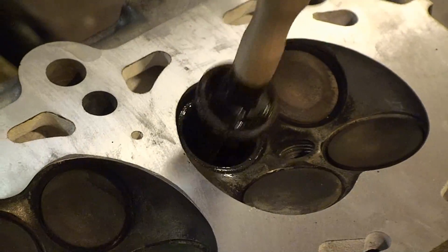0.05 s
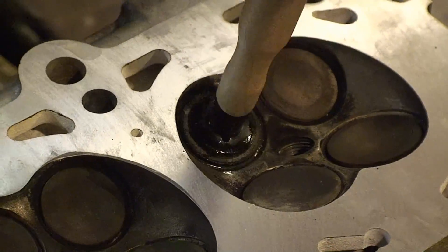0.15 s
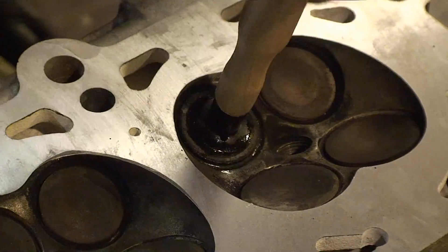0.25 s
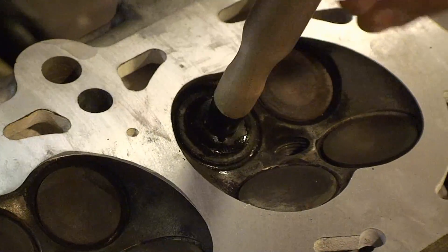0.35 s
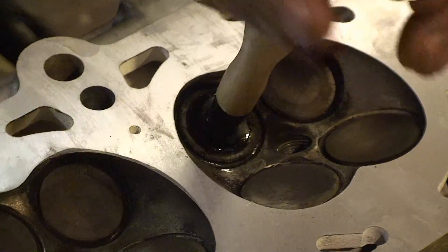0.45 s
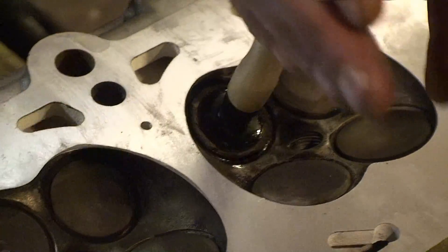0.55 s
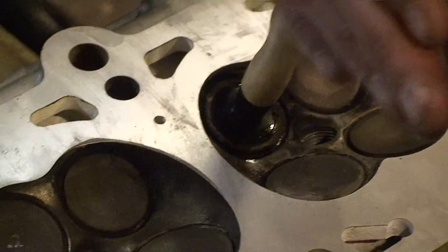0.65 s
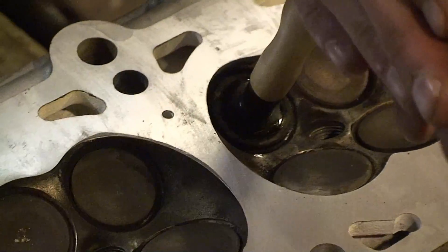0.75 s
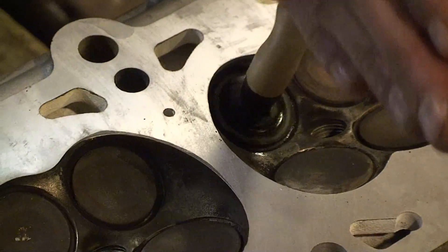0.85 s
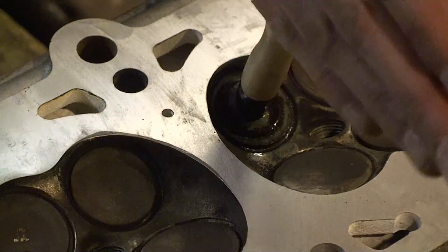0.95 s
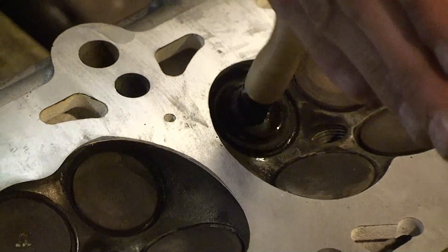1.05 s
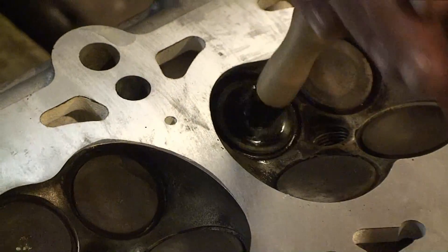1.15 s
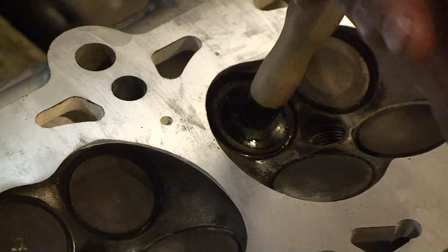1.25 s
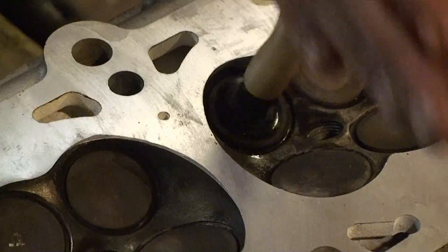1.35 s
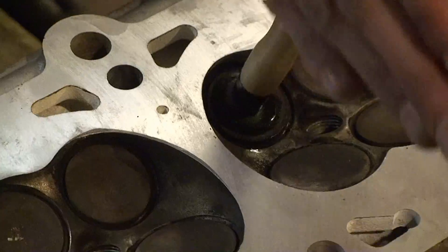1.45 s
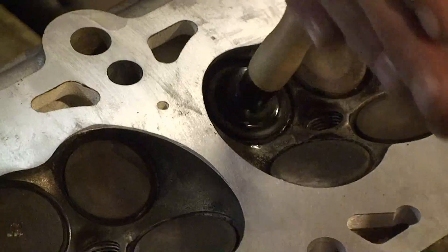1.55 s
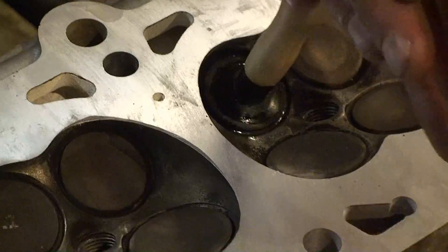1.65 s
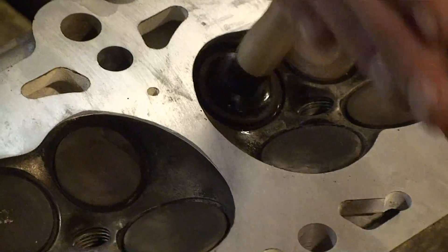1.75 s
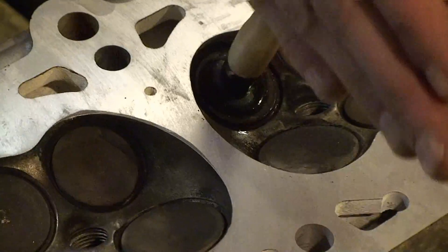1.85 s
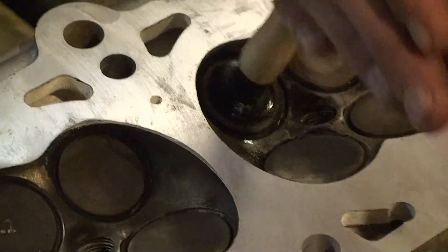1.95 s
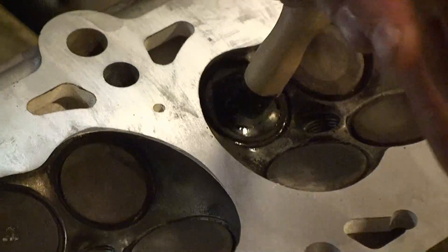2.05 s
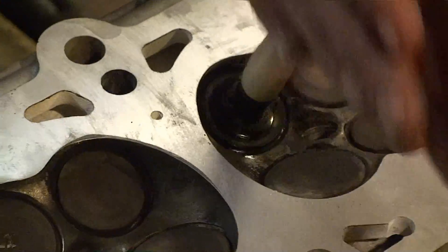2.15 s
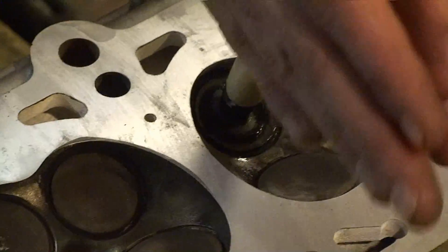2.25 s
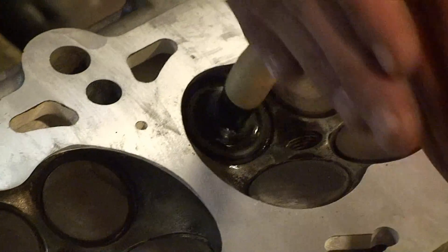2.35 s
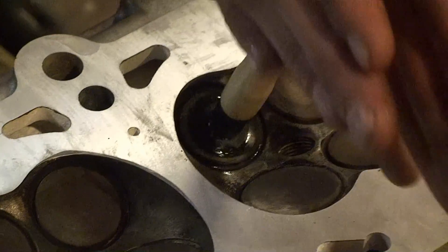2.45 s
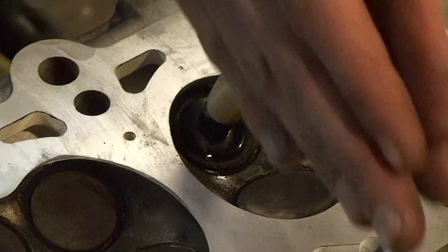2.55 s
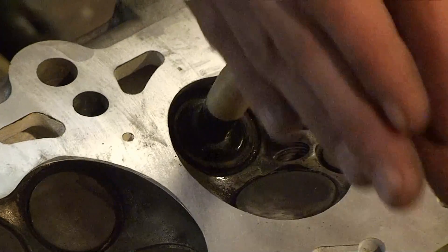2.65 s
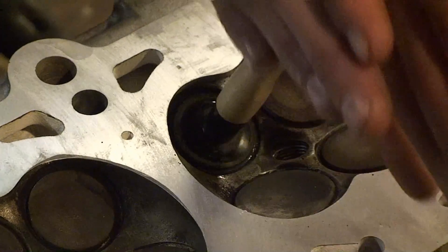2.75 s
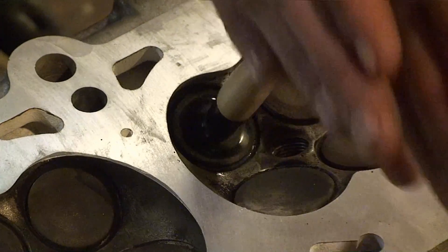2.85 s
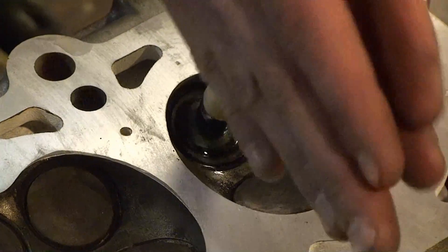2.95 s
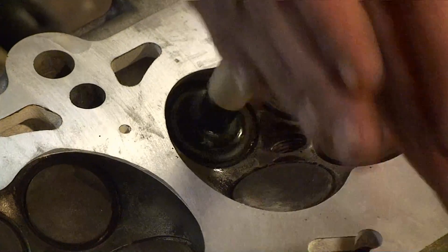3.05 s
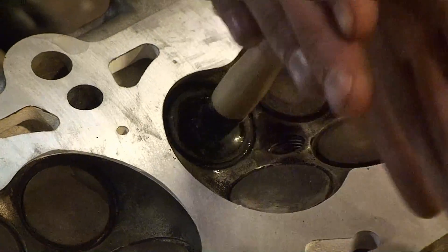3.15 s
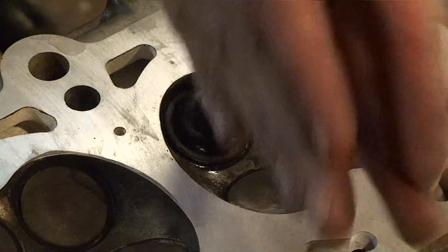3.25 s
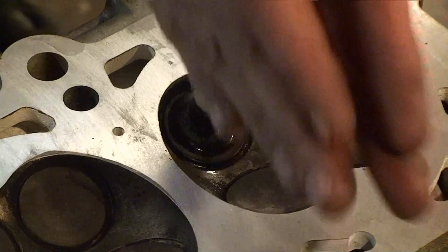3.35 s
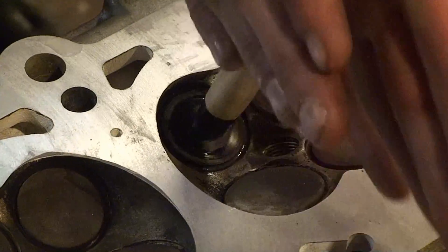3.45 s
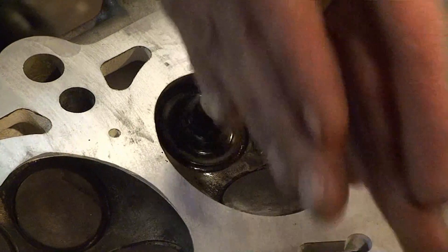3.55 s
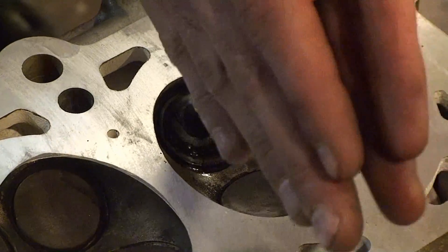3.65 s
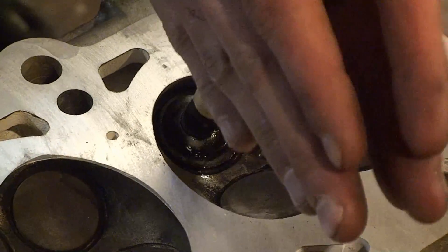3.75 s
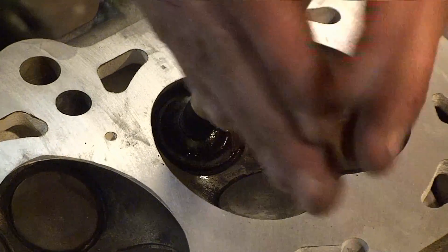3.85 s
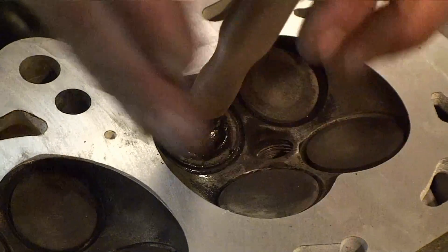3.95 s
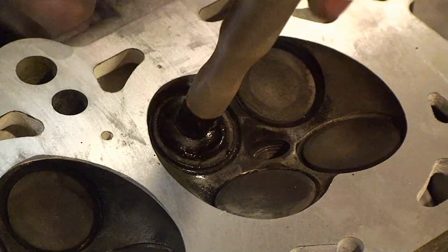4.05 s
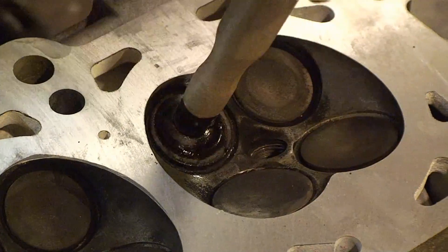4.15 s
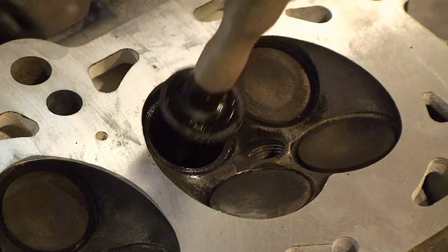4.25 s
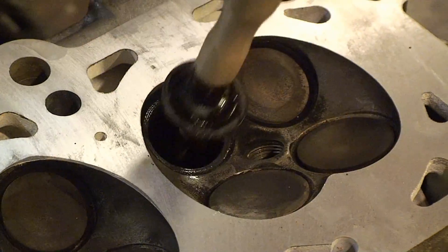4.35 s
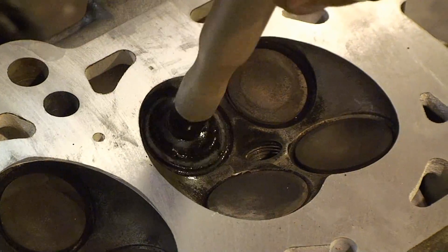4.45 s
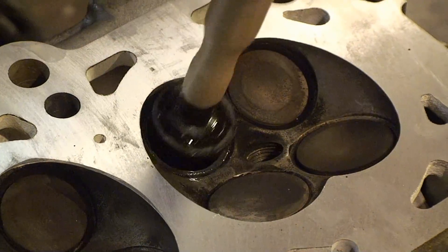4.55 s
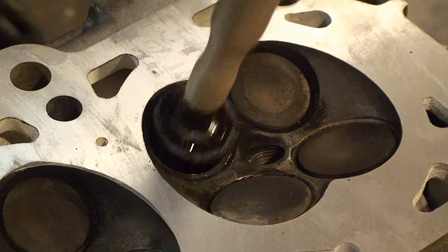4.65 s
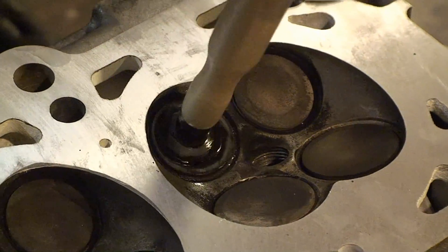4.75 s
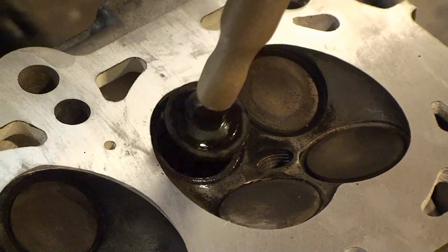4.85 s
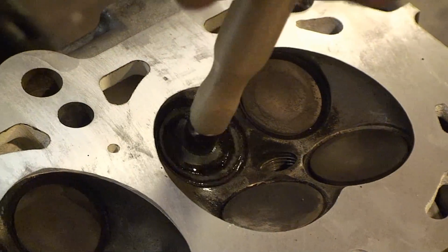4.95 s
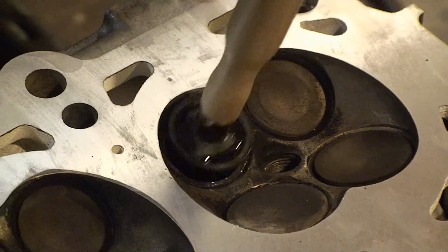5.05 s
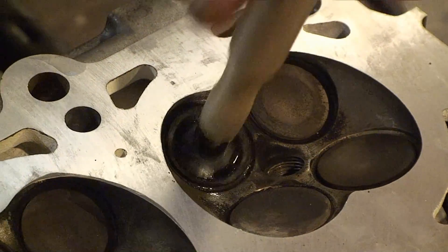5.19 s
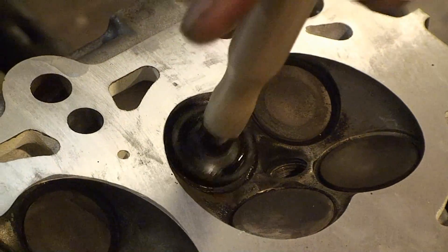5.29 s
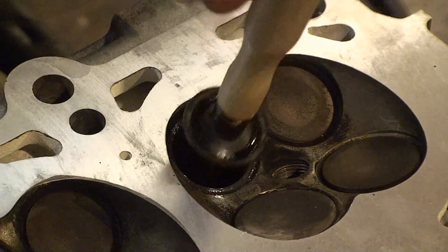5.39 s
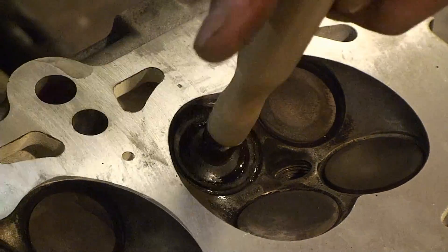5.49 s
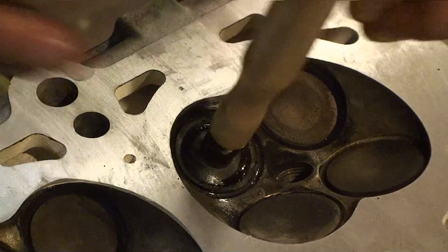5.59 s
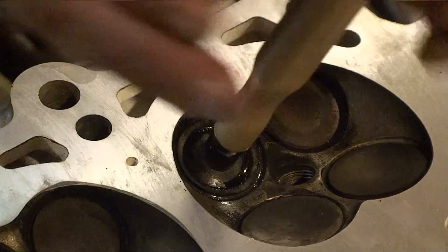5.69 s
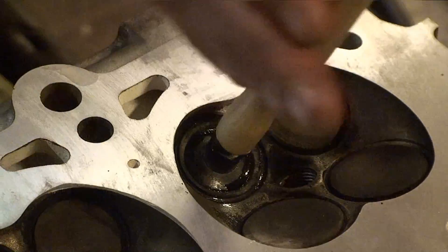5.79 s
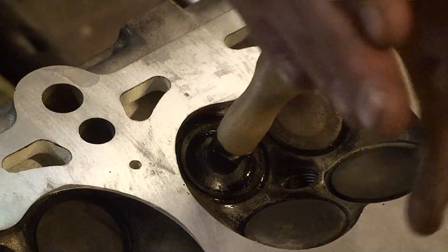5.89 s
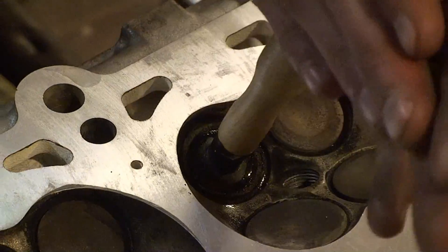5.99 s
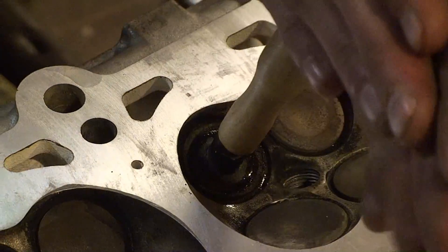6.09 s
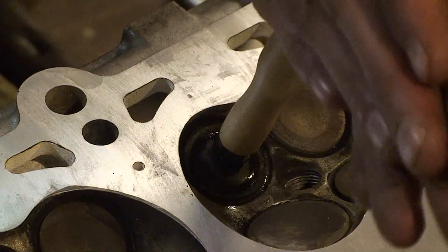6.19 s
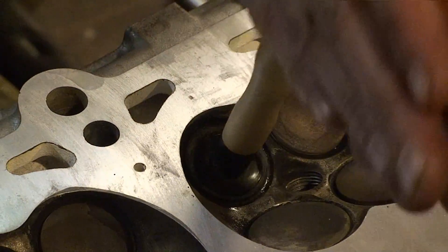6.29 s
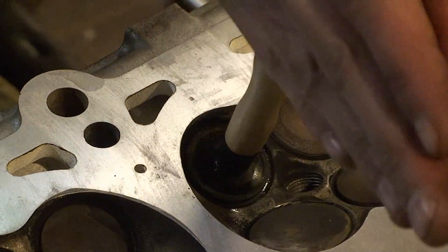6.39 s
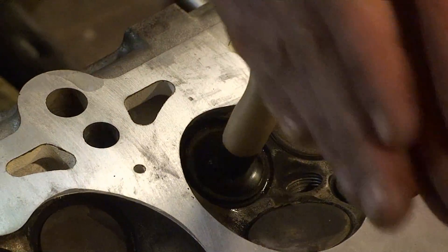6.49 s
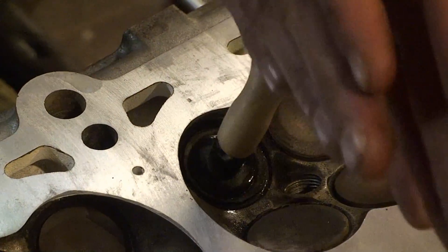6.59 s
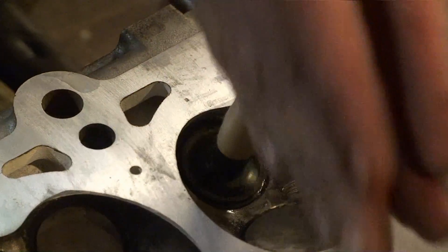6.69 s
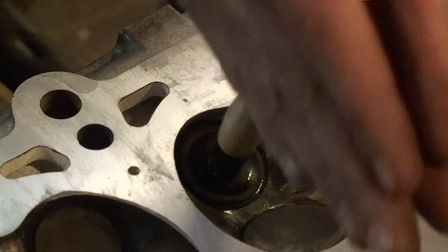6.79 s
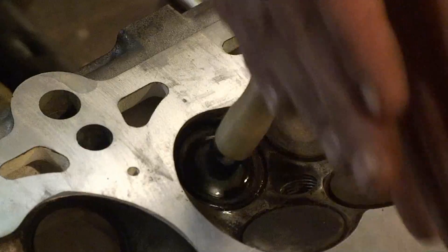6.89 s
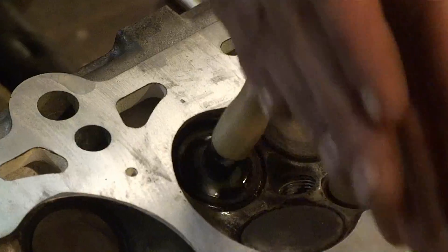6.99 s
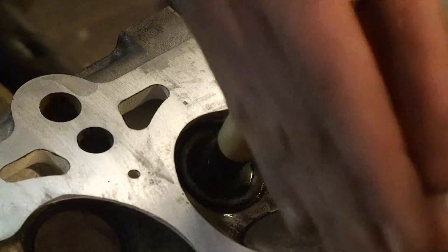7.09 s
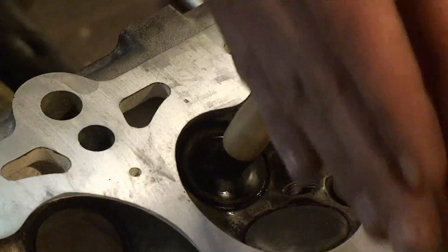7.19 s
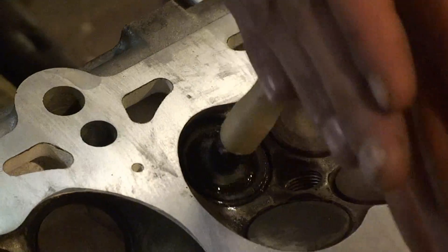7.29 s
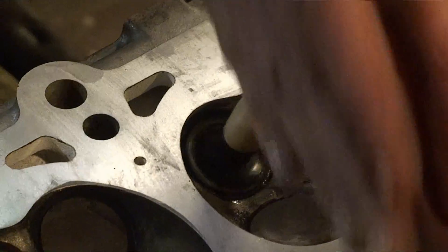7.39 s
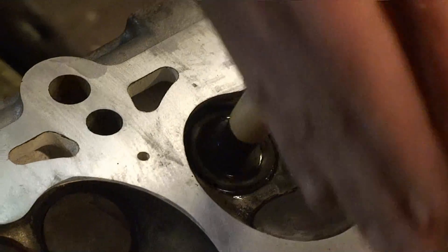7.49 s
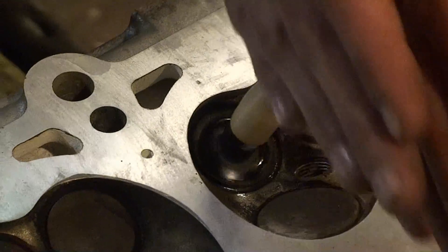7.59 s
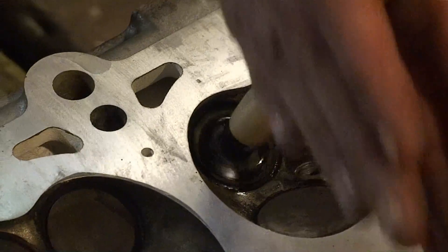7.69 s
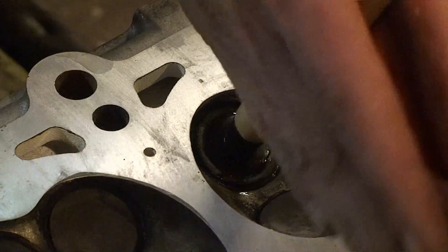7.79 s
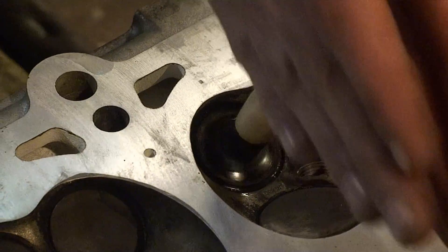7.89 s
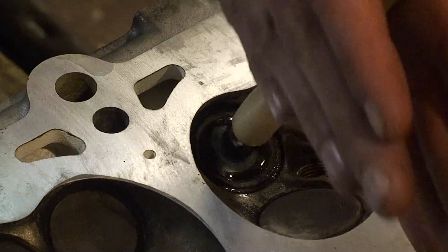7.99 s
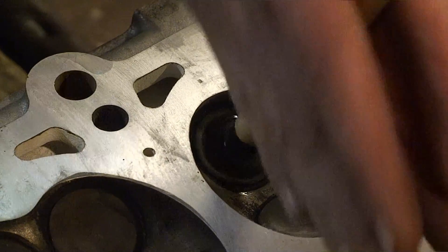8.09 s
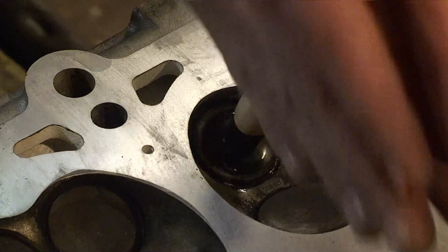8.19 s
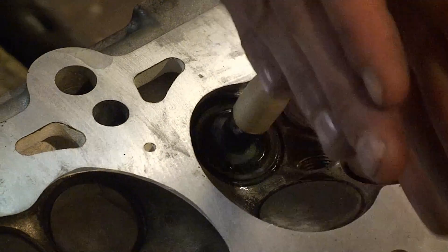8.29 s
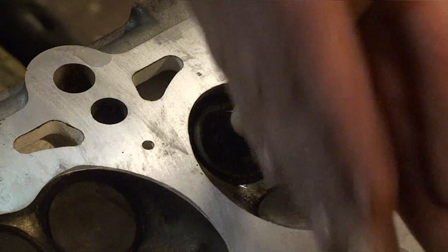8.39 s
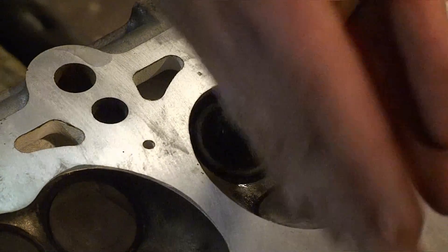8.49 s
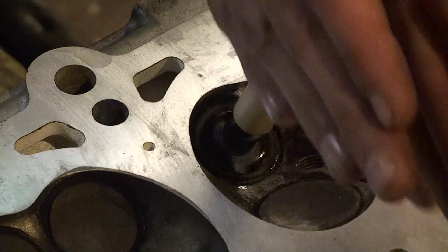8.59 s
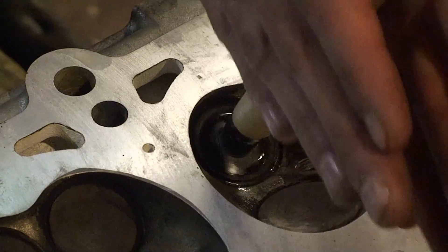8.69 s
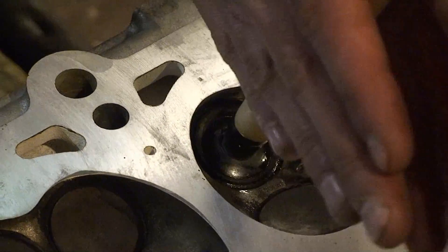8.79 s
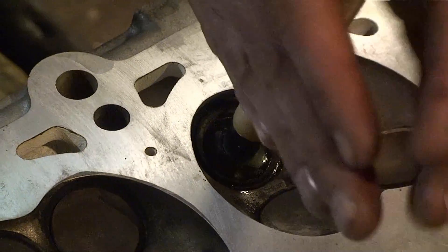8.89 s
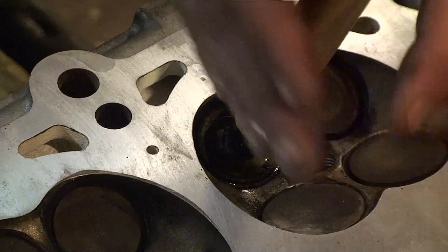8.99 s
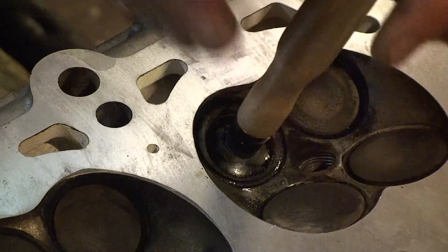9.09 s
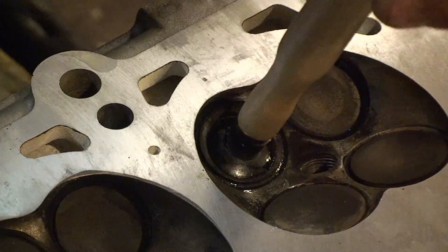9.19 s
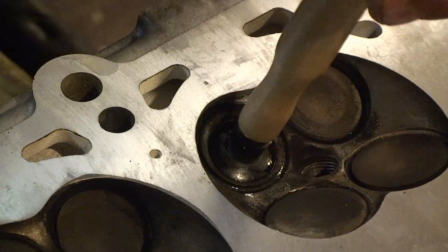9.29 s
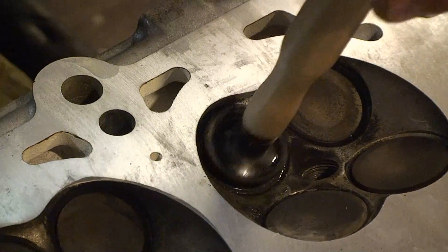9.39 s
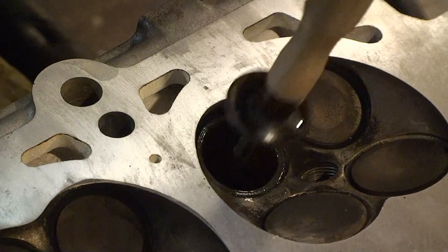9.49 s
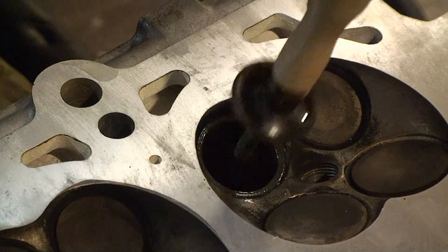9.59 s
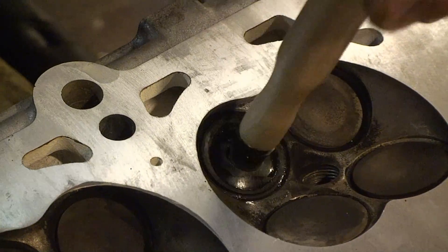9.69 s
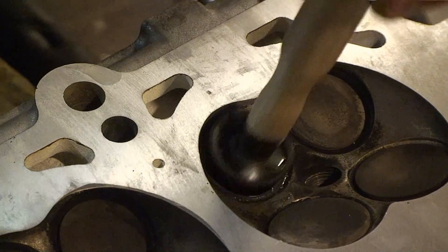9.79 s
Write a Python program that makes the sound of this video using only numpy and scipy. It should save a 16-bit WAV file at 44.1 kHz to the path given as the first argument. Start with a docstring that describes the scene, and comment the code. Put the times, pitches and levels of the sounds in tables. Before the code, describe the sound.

A valve clacks once onto its seat in a metal cylinder head. Rapid alternating scrapes begin, about five or six a second, coarse with cracking grains, wearing down to finer, softer hiss. Four strong taps and a weak one break the work; the scraping returns coarse and wears fine again. Hand ticks and a single tap end it. Close microphone, slightly left, short garage reflections, low hum.

```python
"""A low hum and faint air open the scene; then a valve knocks, ringing, on its seat in a small garage.
Two spells of lapping follow: a stick rolled between the palms twists the valve to and fro on gritty paste.
Random grain impacts excite modes of valve and head; coarse crunch wears down to a fine hiss in each spell.
Between spells paired contact impulses tap the valve on its seat; filtered noise makes the air and hum,
and decaying noise makes the answer of the walls."""
import sys
import numpy as np
from scipy import signal
from scipy.fft import rfft, irfft, next_fast_len
from scipy.io import wavfile
from scipy.ndimage import uniform_filter1d, map_coordinates

SR = 44100
rng = np.random.default_rng(int(sys.argv[2]) if len(sys.argv) > 2 else 0)


def digitize_waveform(pressure):
    """Quantize a signal to 16-bit integers and store it at the path in sys.argv[1].

    Rows of a 2-D input are taken as channels; values are limited to [-1, 1].
    """
    field = np.atleast_2d(pressure).T
    bounded = np.clip(field, -1, 1)
    quanta = np.round(bounded * 32767).astype(np.int16)
    wavfile.write(sys.argv[1], SR, quanta)


N = 433944  # length of the scene [samples]


def amp(db):
    """Logarithmic level: decibels to amplitude gain."""
    return 10 ** (np.asarray(db) / 20)


def unit(x):
    """Normalisation: x scaled to rms 1."""
    return x / np.sqrt(np.mean(np.abs(x) ** 2) + 1e-20)


def along(points, hz):
    """Logarithmic frequency scale: (frequency [Hz], value) points interpolated at hz."""
    frequency, value = np.transpose(points)
    return np.interp(np.log(hz + 1), np.log(frequency + 1), value)


def curve(rows):
    """Linear interpolation: (time [s], value) rows as one value per sample."""
    return np.interp(np.arange(N) / SR, *np.transpose(rows))


def wobble(rate):
    """Slow random modulation: a smooth curve through rate random knots a second."""
    knots = rng.standard_normal(int(N * rate / SR) + 4)
    return map_coordinates(knots, [np.arange(N) * rate / SR])


def swells(rows, fall_s):
    """Exponential swell: a gain rises to each (time [s], level [dB]) row and falls by 1/e in fall_s."""
    t = np.arange(N) / SR
    return sum(amp(db) * np.exp(-np.abs(t - s) / fall_s) for s, db in rows)


def add(track, s, sound):
    """Superposition: a sound mixed into a track at time s."""
    part = track[round(s * SR):][:len(sound)]
    part += sound[:len(part)]


def filtered(x, response):
    """Linear filtering: the spectrum of x times a complex response of frequency."""
    n = x.shape[-1]
    padded = 2 * next_fast_len((n + SR // 2) // 2)  # room for the ringing to die away
    hz = np.fft.rfftfreq(padded, 1 / SR)
    return irfft(rfft(x, padded) * response(hz), padded)[..., :n]


def causal(points, hz):
    """Minimum phase: the folded cepstrum of (frequency [Hz], gain [dB]) points gives a causal response."""
    cepstrum = irfft(np.log(amp(along(points, hz))))
    half = len(cepstrum) // 2
    fold = np.r_[1, np.full(half - 1, 2), 1, np.zeros(half - 1)]
    return np.exp(rfft(cepstrum * fold))


def resonance(hz, centre, width):
    """Damped oscillator: the response of one mode, gain 1 at its centre."""
    return 1j * hz * width / (centre ** 2 - hz ** 2 + 1j * hz * width)


def noise(spectrum):
    """Spectral shaping: Gaussian noise coloured by (frequency [Hz], level [dB]) points, rms 1."""
    return unit(filtered(rng.standard_normal(N), lambda hz: amp(along(spectrum, hz))))


def grains(rate, spread_db):
    """Shot noise: random impulses of uneven size and either sign, rate a second, rms 1."""
    sizes = amp(spread_db * rng.standard_normal(N)) * rng.choice([-1, 1], N)
    struck = rng.random(N) < rate / SR
    return unit(struck * sizes / np.sqrt(rate))


def burst(t60):
    """Exponential decay: a short dying rattle of micro-contacts, energy 1."""
    t = np.arange(SR // 10) / SR
    x = amp(-60 * t / t60) * rng.standard_normal(len(t))
    return x / np.linalg.norm(x)


# spectrum of the room air: (frequency [Hz], relative density [dB per Hz])
AIR_SPECTRUM = [(15, -46), (25, -10.5), (59, -22), (86, -5.5), (107, -9), (173, -7.5), (368, -9),
                (445, -13.5), (722, -8), (895, -9), (970, -14), (2300, -19.5), (2920, -23.5), (4380, -26.5),
                (15500, -34.5)]
# level of the hum: (time [s], level [dB])
HUM_LEVEL = [(0.0, -73.5), (4.15, -75), (4.55, -67.5), (4.85, -70), (5.1, -63.5), (5.8, -71), (6.1, -75),
             (7.9, -68.5), (8.74, -64.5), (9.84, -69.5)]
AIR_DB = -65


def background():
    """Filtered noise: broadband room air and a narrow-band, wavering low hum."""
    air = amp(AIR_DB + 0.2 * wobble(1.36)) * noise(AIR_SPECTRUM)
    hum = unit(filtered(rng.standard_normal(N), lambda hz: resonance(hz, 106.2, 26.6) ** 2))
    return air + amp(curve(HUM_LEVEL)) * hum


# reverberation time of the garage: (frequency [Hz], time to fall 60 dB [s])
GARAGE_T60 = [(120, 0.29), (400, 0.5), (900, 0.28), (3000, 0.26), (7000, 0.26), (14000, 0.082)]


def garage(x, size=8192):
    """Reverberation by convolution: the walls' answer shifts as the hands move; the top dies first."""
    wet = np.zeros(N + SR)
    delay = round(.009 * SR)  # 9 ms to the walls and back
    for i in range(0, N, size):  # a new random tail for each block
        hz, t, z = signal.stft(rng.standard_normal(SR // 2), SR, nperseg=256)
        decay = amp(-60 * t / along(GARAGE_T60, hz)[:, None])
        tail = signal.istft(z * decay, SR, nperseg=256)[1]
        answer = signal.fftconvolve(x[i:i + size], tail / np.linalg.norm(tail))
        wet[i + delay:][:len(answer)] += answer
    return wet[:N]


# a palm sliding off the stick: (time at its loudest [s], level [dB])
PALM_BRUSHES = [(9.06, -67), (9.28, -75)]
BRUSH_FALL_S = 0.077
# light ticks of fingers and stick: (time [s], level [dB])
FINGER_TICKS = [(0.4823, -47), (4.153, -42), (4.2178, -45), (9.0514, -36), (9.2824, -42), (9.3028, -42)]
# contact spectrum of skin: (frequency [Hz], relative level [dB])
SKIN_CONTACT = [(300, -14), (1200, 1), (3000, 0), (6000, 4), (9000, -10), (15000, -19)]


def handling():
    """Friction and light impact: palms brush off the stick, fingers tick on it."""
    touch = swells(PALM_BRUSHES, BRUSH_FALL_S) * grains(1000, spread_db=3.5)
    for s, db in FINGER_TICKS:
        add(touch, s, amp(db) * burst(t60=.025))
    return filtered(touch, lambda hz: unit(causal(SKIN_CONTACT, hz)))


# cylinder head with the valve seated in it: (frequency [Hz], width [Hz], level [dB])
HEAD_MODES = [(724, 22, -8.5), (858.4, 20.7, 4.5), (933, 78, -0.5), (907, 49, -13), (983, 34, -15),
              (1056, 240, -18), (1287, 26, -9), (1316, 5.8, -1.5), (1404, 57, -12), (1480, 4.4, -39),
              (1740, 16, -12), (2523, 33, -13), (2664, 77, -10), (2893, 6.3, -2), (2733, 60, -14),
              (3558, 85, -7), (3850, 220, -18), (4270, 61, -12.5), (5045, 230, -21), (5820, 620, -17.5),
              (6400, 340, -18.5), (6916, 56, -9), (8550, 113, -26.5), (11450, 490, -24)]
# the crowd of weaker modes between them: (frequency [Hz], level [dB])
WEAK_MODES = [(40, -47), (100, -39), (220, -22.5), (400, -10.5), (560, -18.5), (1200, -28), (2000, -19),
              (2400, -24), (4600, -27.5), (6300, -12.5), (10000, -33.5), (15000, -27.5)]


def head(force, contact):
    """Modal superposition: the metal rings under a force with this contact spectrum; energy is kept."""
    def response(hz):
        modes = sum(amp(db) * resonance(hz, f, width) for f, width, db in HEAD_MODES)
        return unit((modes + causal(WEAK_MODES, hz)) * causal(contact, hz))
    return filtered(force, response)


# the valve's own lightly damped modes, upper then lower: (frequency [Hz], width [Hz])
VALVE_MODES = [(2922, 22), (2178, 14)]
UPPER_MODE, LOWER_MODE = VALVE_MODES


def valve(force, mode):
    """Modal resonance: one (frequency [Hz], width [Hz]) mode rings under a force; energy is kept."""
    return filtered(force, lambda hz: unit(resonance(hz, *mode)))


# the seat grabs and the stem chatters: (time at its loudest [s], level [dB])
STEM_CHATTERS = [(1.148, -31.5), (6.935, -34), (7.12, -38), (7.297, -35.5)]
CHATTER_FALL_S = 0.02
# contact of the stem in its guide: (frequency [Hz], relative level [dB])
STEM_CONTACT = [(100, -22), (300, -14), (550, -10.5), (850, 6), (1100, 1.5), (1500, -8), (3000, -6),
                (8000, -24), (15000, -40)]
# the stem rocks in its guide: at random, and once at each turn
RATTLE_PER_S, RATTLE_DB, TURN_DB = 32, -60.5, -29.5


def rattle():
    """Impact in a clearance: the stem knocks in its guide through each spell, at turns and where it chatters."""
    force = swells(STEM_CHATTERS, CHATTER_FALL_S) * grains(1500, spread_db=2.5)
    knocks = amp(RATTLE_DB) * grains(RATTLE_PER_S, spread_db=3.5)
    for start, end, *_ in LAPPING_SPELLS:
        add(force, start, knocks[round(start * SR):round(end * SR)])
    for start, *_ in STICK_TWISTS:
        add(force, start, amp(TURN_DB) * burst(t60=0.028))
    return head(force, STEM_CONTACT)


# large grains cracking under the valve: (time [s], level [dB])
GRAIN_CRUSHES = [(0.849, -29), (1.076, -13), (1.114, -11), (1.324, -26), (2.347, -11.5), (6.121, -30),
                 (6.191, -19.5), (6.206, -14.5), (6.292, -11), (6.502, -19.5), (7.199, -13.5)]
# contact spectrum of a cracking grain: (frequency [Hz], relative level [dB])
CRUSH_CONTACT = [(40, -7), (200, -7), (600, -4), (900, 5.5), (1400, 7.5), (3000, 1), (7000, -7.5),
                 (14000, -7.5)]
BREAK_DB = -22  # grains cracking as a full-speed twist breaks free


def crushes():
    """Brittle fracture: large grains burst into fragments; smaller ones do so as every twist starts."""
    force = np.zeros(N)
    for s, db in GRAIN_CRUSHES:
        add(force, s, amp(db) * burst(t60=0.032))
    for start, _, top_speed in STICK_TWISTS:
        add(force, start, amp(BREAK_DB) * top_speed * burst(t60=0.17))
    return head(force, CRUSH_CONTACT)


# the valve dropped on its seat: (time [s], knock level [dB], valve ring re knock [dB],
# crack re knock [dB], overtone favoured by the spot that lands [Hz])
SEAT_TAPS = [(0.162, 0, -7.5, -10.5, 4100), (4.47, 1.5, -9.5, -9.5, 3560), (4.749, -17, -30, -14, 3620),
             (4.987, -1.5, -16, -14, 4400), (5.2523, -2, -32, -8.5, 3560), (5.4976, -0.5, -8, -9, 4280),
             (9.75, -4, -8.5, -12.5, 3970)]
# contact spectrum of a blow on the seat: (frequency [Hz], relative level [dB])
BLOW_CONTACT = [(40, -11), (110, 16.5), (210, 13.5), (320, -1), (520, -9), (700, 3.5), (880, 10),
                (1150, 2.5), (1400, 2), (2000, -22.5), (2650, 7), (4200, -20), (6300, -12), (14000, -31)]
# spectrum of the steel crack: (frequency [Hz], relative level [dB])
CRACK_SPECTRUM = [(60, -58), (500, -0.5), (1500, 3), (2800, 3.5), (4200, 0), (6400, -7.5), (9000, -11.5),
                  (14000, -32)]
SEATED_WIDTH_HZ = 46  # landing on its seat damps the valve's higher modes


def taps(landing=0.002132, rim_db=-13, rim_crack_db=-6.5, overtone_db=-20.5):
    """Double impact: one edge touches, then (landing [s] later) the whole rim; both crack, steel on seat."""
    knocks, blows, cracks, overtones = np.zeros((4, N))
    for s, db, ring_db, crack_db, overtone_hz in SEAT_TAPS:
        rim_s = s + landing
        knocks[round(s * SR)] = amp(db)
        knocks[round(rim_s * SR)] = amp(db + rim_db)
        blows[round(rim_s * SR)] = amp(db + ring_db)
        add(cracks, s, amp(db + crack_db) * burst(t60=0.026))
        add(cracks, rim_s, amp(db + crack_db + rim_crack_db) * burst(t60=0.0047))
        overtone = valve(signal.unit_impulse(SR // 4), (overtone_hz, SEATED_WIDTH_HZ))
        add(overtones, s, amp(db + overtone_db) * overtone)
    ringing = valve(blows, (UPPER_MODE[0], SEATED_WIDTH_HZ)) + overtones
    crack = filtered(cracks, lambda hz: unit(causal(CRACK_SPECTRUM, hz)))
    return head(knocks, BLOW_CONTACT) + ringing + crack


# spells of lapping, each on fresh paste: (start [s], end [s], time until the grit is half worn [s],
# time scale of the wear [s], level of the churning paste at the start [dB])
LAPPING_SPELLS = [(0.85, 3.74, 1.84, 0.29, -45), (6.19, 8.87, 1.395, 0.22, -55)]
PASTE_DB_PER_S = -12  # the paste is squeezed out of the seat


def paste():
    """Abrasive wear: in each spell the grit wears down (0-1) and the paste is squeezed out (gain)."""
    wear, fresh = np.zeros((2, N))
    for start, end, half_worn, wear_s, paste_db in LAPPING_SPELLS:
        age = np.arange(round((end - start) * SR)) / SR
        add(wear, start, 1 / (1 + np.exp((half_worn - age) / wear_s)))
        add(fresh, start, amp(paste_db + PASTE_DB_PER_S * age))
    return wear, fresh


# one twist of the stick each: (start [s], length with its rest [s], top speed [0-1])
STICK_TWISTS = [(0.846, 0.19, 0.32), (1.099, .2, 0.61), (1.322, 0.17, 1), (1.484, .23, 0.47),
                (1.738, .18, 0.79), (1.917, 0.22, 0.61), (2.147, 0.18, 0.92), (2.319, 0.19, 0.69),
                (2.511, 0.17, 0.81), (2.673, 0.21, .8), (2.876, 0.17, 0.88), (3.037, 0.2, 0.76),
                (3.22, 0.18, 0.73), (3.39, .16, 0.47), (3.55, .17, 0.49), (6.284, .17, 0.39),
                (6.506, 0.16, 0.66), (6.679, 0.14, 0.87), (6.833, 0.18, 0.7), (7.03, 0.16, 0.81),
                (7.186, 0.19, .66), (7.383, 0.16, 0.97), (7.535, 0.19, 0.83), (7.722, .15, 0.96),
                (7.868, 0.19, 0.66), (8.06, 0.16, 0.73), (8.21, 0.17, 0.63), (8.388, 0.16, .5),
                (8.542, 0.17, 0.45), (8.701, 0.11, 0.09)]
BREAKAWAY, STOP = .14, 0.97  # shares of the arch of speed where a twist begins and is cut off
FASTEST = .44  # share of the twist at which the arch peaks
REST_S = 0.0073  # the valve stands still before it turns back


def twists():
    """Stick and slip: each twist breaks free with a jerk, speeds up and eases out."""
    speed = np.zeros(N)
    for start, length, top_speed in STICK_TWISTS:
        u = np.linspace(0, 1, round((length - REST_S) * SR))
        phase = np.interp(u, [0, FASTEST, 1], [BREAKAWAY, .5, STOP])
        add(speed, start, top_speed * np.sin(np.pi * phase) ** 2)
    return speed


# contact spectrum of coarse grit: (frequency [Hz], relative level [dB])
COARSE_CONTACT = [(100, -15), (200, -14), (530, -16.5), (850, 6), (2200, 9), (3600, -4.5), (5000, 0.5),
                  (8000, -24), (15000, -27)]
# contact spectrum of fine grit: (frequency [Hz], relative level [dB])
FINE_CONTACT = [(100, -13), (900, -32.5), (1500, 6.5), (3000, -3), (4500, 4.5), (6500, -1.5), (9500, 3.5),
                (12000, -4.5), (14000, -29), (15500, -5)]
# spectrum of the churning paste: (frequency [Hz], relative level [dB])
PASTE_SPECTRUM = [(100, -29), (250, 5.5), (400, 8), (550, -2), (900, 14), (2000, -36), (8000, -60)]
# force gains [dB], and their change once the grit is worn [dB]
GRIT_DB, GRIT_WEAR_DB = -37, -15  # coarse crunch
RING_DB, RING_WEAR_DB = -42, -9  # the valve's upper mode under the grit
LOW_RING_DB, LOW_RING_WEAR_DB = -51.5, -6.5  # its lower mode
HISS_DB = -45.5  # fine grit, with no wear


def grinding():
    """Friction-driven modes: coarse grit crunches and rings the valve even when slow; hiss needs speed."""
    speed = twists()
    wear, fresh = paste()
    judder = wobble(85)  # the valve rocks on the grains
    crunch = speed ** 0.34 * amp(1.38 * judder) * grains(450 + 1500 * speed, spread_db=4.0)
    hiss = speed ** 0.76 * amp(1.0 * judder) * grains(2000 + 7000 * speed, spread_db=1.5)

    upper = valve(amp(RING_DB + RING_WEAR_DB * wear) * crunch, UPPER_MODE)
    lower = valve(amp(LOW_RING_DB + LOW_RING_WEAR_DB * wear) * crunch, LOWER_MODE)
    # paste damps the valve as it comes to rest
    damping = uniform_filter1d(speed, size=400).clip(0) ** 0.19
    ringing = (upper + lower) * damping

    coarse = head(amp(GRIT_DB + GRIT_WEAR_DB * wear) * crunch, COARSE_CONTACT)
    fine = head(amp(HISS_DB) * hiss, FINE_CONTACT)
    churn = fresh * np.sqrt(speed) * noise(PASTE_SPECTRUM)
    return coarse + fine + churn, ringing


# balance of the two channels: (frequency [Hz], left minus right [dB])
LEFT_LEAN = [(60, 1), (200, 1.5), (800, 2.5), (1500, 2), (3000, 1.65), (5000, 0), (8000, 1.5), (13000, 0)]
# width of the stereo image: (frequency [Hz], side minus mid [dB])
STEREO_SPREAD = [(30, -4), (90, -29), (300, -12), (900, -17), (4000, -15.5), (6000, -16), (8800, -8),
                 (11500, -8.5)]
# how much of each the walls return
GRIND_ROOM_DB, RING_ROOM_DB, TAP_ROOM_DB = -8, -15, -8


def scene():
    """Direct and reflected sound: the work and its room heard close in stereo, a little to the left."""
    scrape, ringing = grinding()
    grind = scrape + rattle() + crushes() + handling()
    knocks = taps()
    walls = garage(amp(GRIND_ROOM_DB) * grind + amp(RING_ROOM_DB) * ringing + amp(TAP_ROOM_DB) * knocks)
    mid = grind + ringing + knocks + walls + background()
    side = filtered(garage(mid), lambda hz: amp(along(STEREO_SPREAD, hz)))
    stereo = np.array([mid + side, mid - side])
    return filtered(stereo, lambda hz: amp(np.outer([.5, -.5], along(LEFT_LEAN, hz))))


TOP_HZ = 15800


def record(dry):
    """Band limiting: nothing from TOP_HZ upwards is kept."""
    return filtered(dry, lambda hz: hz < TOP_HZ)


dry = scene()
out = record(dry)
digitize_waveform(out)
```